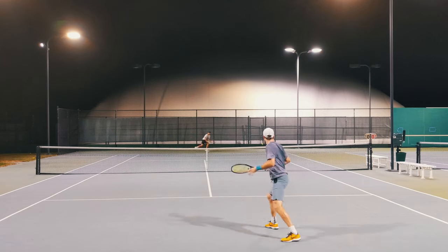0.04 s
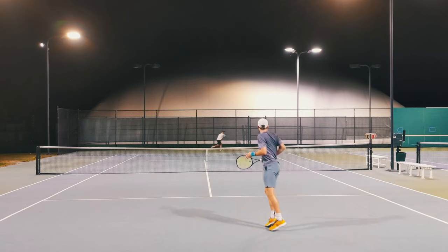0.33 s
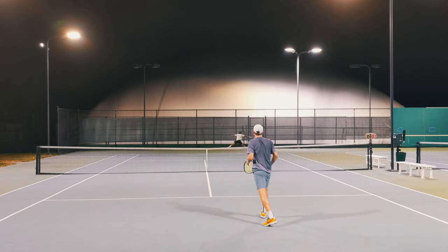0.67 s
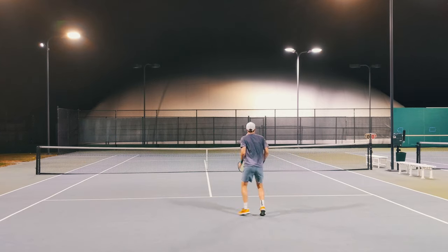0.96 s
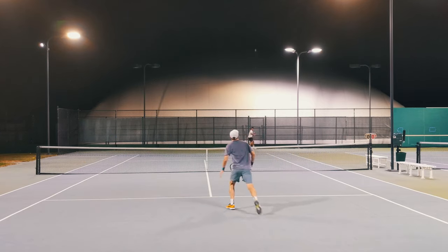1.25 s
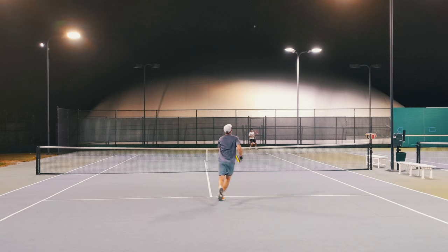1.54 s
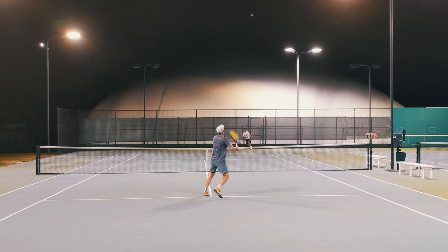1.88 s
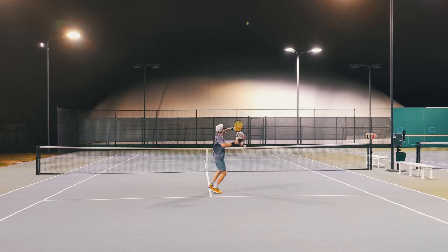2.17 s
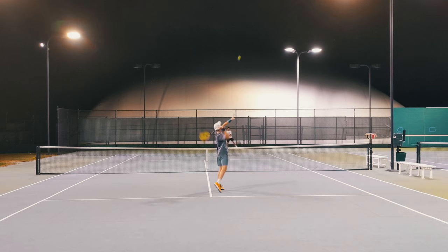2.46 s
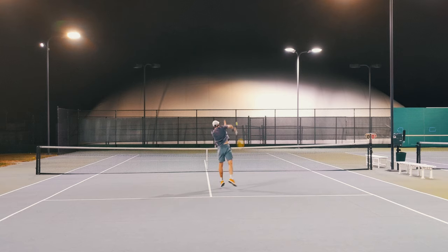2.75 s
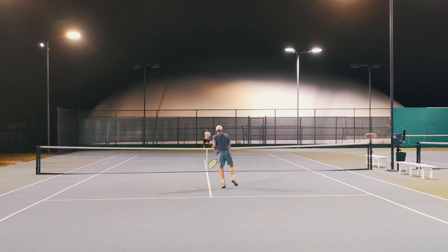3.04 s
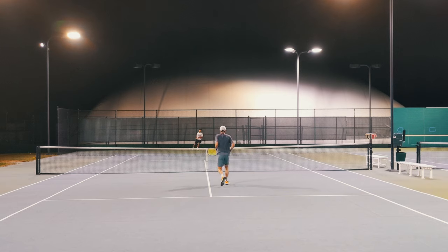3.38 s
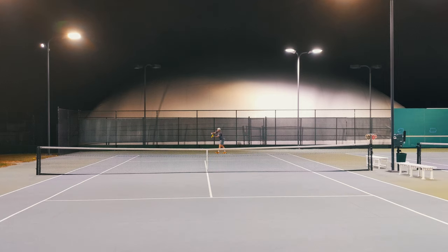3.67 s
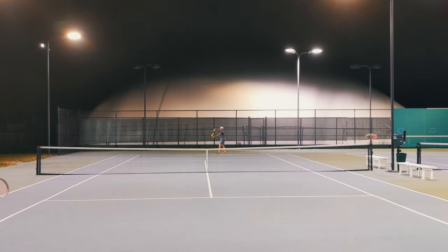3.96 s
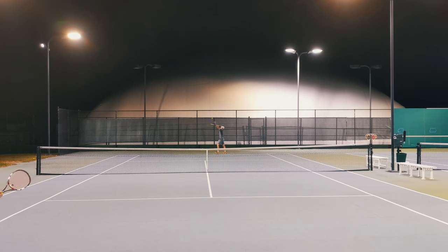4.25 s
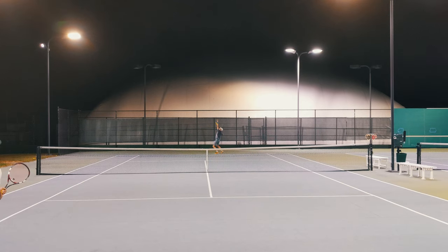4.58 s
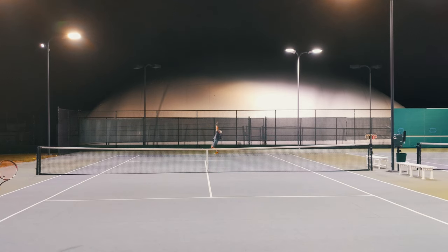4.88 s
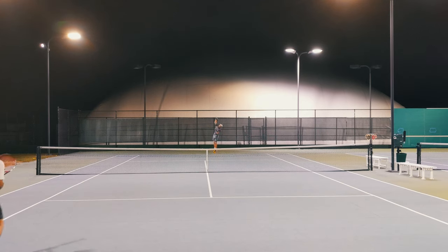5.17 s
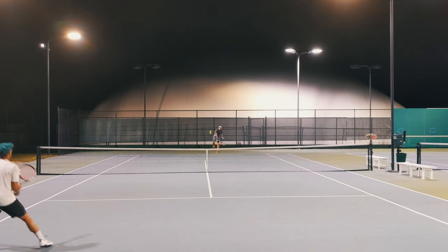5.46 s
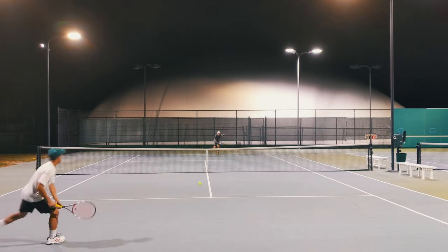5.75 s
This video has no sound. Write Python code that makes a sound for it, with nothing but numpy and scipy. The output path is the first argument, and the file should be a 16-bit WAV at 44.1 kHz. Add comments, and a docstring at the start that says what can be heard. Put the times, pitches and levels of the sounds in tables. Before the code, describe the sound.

On an outdoor tennis court at night, light steps and gritty shoe scuffs pass close to the microphone. A loud overhead smash cracks out, the ball knocks on the ground, and walls slap the sound back. After a lull, another racket hit pops and echoes, followed by a sliding shoe. Crickets chirr throughout above the faint rumble of a town, where a distant engine swells twice.

```python
"""Crickets trill to the left of the microphones, over the low rumble and hum of a town at night.
Close by, on an outdoor hard court, soles scuff and slide over grit, and ball and feet knock on the ground.
Far off, an engine pulls twice. An overhead smash comes at 2.8 s and a second stroke at 5.4 s:
the ball thumps into the strings and pops free, and the fences and walls throw each hit back."""
import sys
import numpy as np
from scipy import signal
from scipy.fft import rfft, irfft
from scipy.io import wavfile
from scipy.ndimage import uniform_filter1d

SR = 44100
rng = np.random.default_rng(int(sys.argv[2]) if len(sys.argv) > 2 else 0)


def store_wav(level_fs):
    """Save 16-bit WAV to argv[1]."""
    pcm = np.round(np.clip(np.atleast_2d(level_fs), -1, 1) * 32767)
    wavfile.write(sys.argv[1], SR, pcm.T.astype(np.int16))


N = 256662
TIME = np.arange(N) / SR


def amp(db):
    """Decibels to gain."""
    return 10 ** (np.asarray(db) / 20)


def unit_rms(x):
    """Scales to rms 1."""
    return x / np.sqrt(np.mean(x ** 2) + 1e-20)


def at_hz(points, hz):
    """Reads a table on a log-frequency axis."""
    f, value = np.transpose(points)
    return np.interp(np.log(hz + 1), np.log(f + 1), value)


def add(mix, s, sound):
    """Mixes a stereo sound in at time s."""
    part = mix[:, max(round(s * SR), 0):][:, :sound.shape[1]]
    part += sound[:, :part.shape[1]]


def panned(x, balance_db):
    """Sets the level of the left microphone against the right."""
    return x * amp(np.array([[.5], [-.5]]) * balance_db)


def decay(t, t60):
    """Falls 60 dB in t60 seconds."""
    return np.exp(-np.log(1000) * t / t60)


def wander(per_s):
    """A smooth random drift of about unit size."""
    knots = rng.standard_normal(int(N / SR * per_s) + 2)
    return np.interp(TIME * per_s, np.arange(len(knots)), knots)


def noise(colour, size, lag=0., likeness=0.74):
    """Coloured stereo noise at rms 1; its shared part reaches the left microphone lag seconds late."""
    hz = np.fft.rfftfreq(size, 1 / SR)
    shared, left, right = rfft(rng.standard_normal((3, size)))
    common = np.array([shared * np.exp(-2j * np.pi * hz * lag), shared])
    pair = np.sqrt(likeness) * common + np.sqrt(1 - likeness) * np.array([left, right])
    return unit_rms(irfft(pair * amp(at_hz(colour, hz)), size))


def trill(hz, rate, jitter_hz, glide_hz=240, unsteady=0.024):
    """Each closing of a cricket's wings scrapes out one pulse that starts quickly and falls in pitch."""
    beat = (rng.random() + np.cumsum(rate * (1 + unsteady * wander(5))) / SR) % 1
    pitch = hz + glide_hz * (.4 - beat) + jitter_hz * wander(160)
    pulse = np.sin(np.pi * np.minimum(beat / 0.8, 1) ** 0.78) ** 2
    return unit_rms(pulse * np.sin(2 * np.pi * np.cumsum(pitch) / SR))


def scattered(x, diffuse, lead_s=0.000409):
    """Sound from the left, partly scattered by grass, fence and trees along slowly changing paths."""
    t = np.arange(4096) / SR
    paths = rng.standard_normal((2, 2, len(t))) * np.exp(-t / 0.036)
    one, other = signal.oaconvolve(x[None, None], paths, axes=2)[..., :N]
    turn = np.pi * wander(1.6)
    wash = np.cos(turn) * one + np.sin(turn) * other
    direct = np.array([x, np.interp(TIME - lead_s, TIME, x)])
    return np.sqrt(1 - diffuse) * unit_rms(direct) + np.sqrt(diffuse) * unit_rms(wash)


# Spectrum of the farthest crickets: f/Hz, relative level/dB
FAR_CHORUS = [(4300, -28), (4650, -20.5), (4900, -14), (5100, -0.5), (5300, -7), (5550, -5.5),
              (5750, -15.5), (5950, -21), (6200, -73)]
# Groups behind the near cricket: f/Hz, spread/Hz, jitter/Hz, wing rate/Hz, level/dB, L-R/dB, diffuse share
CRICKET_GROUPS = [(5350, 190, 75, 72, -57, -1, 0.79), (2774, 110, 130, 52, -71.5, 4, 0.35),
                  (7430, 440, 220, 33, -77.5, -0.5, 1)]
# One lower cricket joins in briefly: t/s, level/dB
SHORT_TRILL = [(3.66, -95), (3.72, -66), (3.99, -71), (4.02, -95)]
def crickets(count=5, rate_spread=.03, near_db=-61, far_db=-60, waver_db=0.9):
    """One cricket is near; groups trill behind it, each animal at its own pitch; the far ones blur."""
    near = scattered(trill(hz=5300, rate=49, jitter_hz=64.5), diffuse=0.2)
    far = noise(FAR_CHORUS, N, lag=-0.000396, likeness=0.13)
    out = panned(amp(near_db) * near + amp(far_db) * far, balance_db=3.5)
    for hz, spread_hz, jitter_hz, rate, db, balance_db, diffuse in CRICKET_GROUPS:
        group = np.zeros(N)
        for offset in np.linspace(-1, 1, count):
            voice = trill(hz + offset * spread_hz, rate * (1 + rate_spread * offset), jitter_hz)
            group += np.exp(-1.3 * abs(offset)) * voice
        out += amp(db + waver_db * wander(5.3)) * panned(scattered(group, diffuse), balance_db)
    joiner = scattered(trill(hz=4880, rate=55, jitter_hz=76.4), diffuse=0.66)
    return out + amp(np.interp(TIME, *np.transpose(SHORT_TRILL))) * joiner


# The distant town, heard from the court: f/Hz, level/dB in a 1 Hz band
TOWN_SPECTRUM = [(15, -75.5), (30, -65.5), (60, -69), (120, -72.5), (170, -76.5), (250, -83.5), (420, -83),
                 (780, -83), (1000, -86.5), (1400, -96), (2000, -103), (4500, -107), (6400, -115),
                 (9300, -111), (12000, -118), (16000, -120)]
# Slow contour that the rumble partly follows: t/s, relative level/dB
RUMBLE_CONTOUR = [(0, -46.5), (.14, -52), (4.6, -50.5), (5.2, -48.5), (5.82, -45)]
# How alike the town is at the two microphones: f/Hz, correlation
TOWN_LIKENESS = [(60, 0.97), (130, 0.97), (290, 0.38), (640, 0.24), (1410, 0.089), (3100, 0.33),
                 (6820, -0.9), (15000, 0.41)]
# The side it leans to: f/Hz, L-R/dB
TOWN_BALANCE = [(60, -0.5), (200, 0.5), (400, 3), (2400, 3.5), (4400, -0.5), (8000, -4.5), (15000, 7.5)]
def town(patchy_db=0.67, swell=0.87, heaves_per_s=9.2, rumble_hz=220):
    """Far traffic and fans: a heaving rumble under a smooth wash."""
    size, hop = 2048, 512
    frames, hz = N // hop + 5, np.fft.rfftfreq(size, 1 / SR)
    a, b, c, d, patches = rng.standard_normal((5, frames, len(hz)))
    patches = unit_rms(uniform_filter1d(uniform_filter1d(patches, size=8, axis=0), size=14, axis=1))
    likeness = at_hz(TOWN_LIKENESS, hz)
    left = a + 1j * b
    right = likeness * left + np.sqrt(1 - likeness ** 2) * (c + 1j * d)
    contour = np.interp(TIME, *np.transpose(RUMBLE_CONTOUR)) + 1.5 * wander(heaves_per_s)
    heave = np.interp(np.arange(frames) * hop / SR, TIME, contour - contour.mean())
    steady_db = at_hz(TOWN_SPECTRUM, hz)
    field_db = steady_db + patchy_db * patches + swell * heave[:, None] / (1 + (hz / rumble_hz) ** 4)
    lean_db = at_hz(TOWN_BALANCE, hz) / 2
    spectra = np.array([left * amp(field_db + lean_db), right * amp(field_db - lean_db)])
    wash = signal.istft(spectra.transpose(0, 2, 1), nperseg=size, noverlap=size - hop)[1][:, :N]
    return unit_rms(wash) * np.sqrt(np.sum(amp(steady_db) ** 2) * hz[1])


def machine_tone(hz, db, drift=0.0126, waver_db=2.5):
    """One tone that wavers in level and pitch."""
    peak = np.sqrt(2) * amp(db + waver_db * wander(12))
    pitch = hz * (1 + drift * wander(14))
    return peak * np.sin(2 * np.pi * np.cumsum(pitch) / SR)


# Steady tones around the court: f/Hz, level/dB
HUM_TONES = [(58.5, -59.5), (116, -66.5), (229.5, -68), (388, -68.5)]
def hum():
    """Floodlights and a blower hum faintly, the same in both microphones."""
    return sum(machine_tone(hz, db) for hz, db in HUM_TONES)


def light_steps(start_s=.3, end_s=3.3, per_s=4.3, length_s=0.025, hiss_db=-68.5, bite_db=1):
    """Soft, unevenly spaced steps of the run to the net, as rows of scuffs."""
    times = start_s + np.cumsum(rng.uniform(.5, 1.5, size=16)) / per_s
    return [(s, length_s, hiss_db, bite_db) for s in times if s < end_s]


# Shoes of the two near players: t/s, length/s, grit hiss/dB, bite (sole rasp over the hiss)/dB
SCUFFS = [(.045, 0.12, -60.5, -2.5), (0.12, 0.032, -68.5, 21), (.143, 0.033, -51, -4),
          (0.174, 0.053, -53.5, 4.5), (.376, 0.049, -51, -13), (.524, .016, -62, 2), (.6, .04, -64.5, 5.5),
          (.875, 0.06, -61, 12.5), (.918, 0.04, -66.5, 20), (.955, .16, -63, 8.5),
          (1.18, 0.036, -52.5, 2.5), (1.218, 0.092, -58.5, 0.5), (1.702, 0.023, -56, 2),
          (2.001, .024, -52.5, 6.5), (2.408, 0.039, -66.5, 12), (2.595, 0.061, -61.5, -1),
          (2.884, .025, -64, 12), (2.96, 0.081, -69, 9.5), (3.396, 0.023, -58.5, -3),
          (3.645, 0.038, -50.5, -5.5), (5.15, 0.06, -62, -15), (5.208, 0.063, -58, -20),
          (5.584, 0.06, -43, -1.5), (5.64, 0.087, -50.5, -0.5), (5.733, 0.035, -49, 1)]
# Where each is, seen from the microphones: t/s, side (negative left, positive right)
RUNNER_PATH = [(0, 0.4), (.55, 0.8), (1.2, 0.13), (2, 0.077)]
PARTNER_PATH = [(5, -1.12), (5.6, -0.47)]
# Hiss of the grit: f/Hz, relative level/dB
GRIT_COLOUR = [(1000, -1), (3500, -6), (5500, 5.5), (7200, 2.5), (9300, 5.5), (10700, -5), (12000, -4),
               (14000, -4.5), (16000, -10.5)]
# Rasp of the sole: multiple of the rasp centre, relative level/dB
RASP_COLOUR = [(.1, -13), (.35, 4), (.7, -6.5), (1, 5.5), (1.3, 1), (1.8, -12.5), (5, -48)]
def scuffs(grain_db=2.5, sag_db=6.5, release_s=0.0087, port_lag_s=0.00031, sizzle_db=4, sizzle_hz=11500):
    """A sole slides over grit, catching and slipping; it grips, fades as it slows and lifts off."""
    out, t = np.zeros((2, N)), (np.arange(12288) - 2048) / SR
    for s, length, hiss_db, bite_db in SCUFFS + light_steps():
        path = RUNNER_PATH if s < PARTNER_PATH[0][0] else PARTNER_PATH
        side = np.interp(s, *np.transpose(path))
        attack_s = 0.0055 + 0.19 * length  # a longer slide takes longer to grip
        grip = (1 + np.tanh(2 * t / attack_s)) / 2
        lift = (1 - np.tanh(2 * (t - length) / release_s)) / 2
        pressure = grip * lift * amp(-sag_db * np.clip(t / length, 0, 1))
        roughness = unit_rms(uniform_filter1d(rng.standard_normal(len(t)), size=70))
        catches = unit_rms(amp(grain_db * roughness))
        # the top of the hiss is stronger from the right, shaded from the left
        hiss_colour = [(hz, db + sizzle_db * side * (hz > sizzle_hz)) for hz, db in GRIT_COLOUR]
        hiss = noise(hiss_colour, len(t), side * port_lag_s, likeness=0.34)
        rasp_hz = 2820 - 106 * np.clip(bite_db - 11, 0, 10)  # a hard bite rasps lower
        rasp_colour = [(k * rasp_hz, db) for k, db in RASP_COLOUR]
        rasp = noise(rasp_colour, len(t), side * port_lag_s, likeness=0.32)
        slide = amp(hiss_db) * (hiss + amp(bite_db) * rasp) * pressure * catches
        add(out, s + t[0], panned(slide, balance_db=1.5)[:, t + s >= 0])
    return out


def thump(t, hz):
    """The air pushed by one short contact, centred on t = 0."""
    u = (np.pi * hz * t) ** 2
    return (1 - 2 * u) * np.exp(-u)


def ring(t, hz, t60, rise):
    """One mode that swells from t = 0 and dies away."""
    t = np.maximum(t, 0)
    return np.sin(2 * np.pi * hz * t) * (1 - np.exp(-t / rise)) * decay(t, t60)


def add_knock(mix, s, thump_db, pock_db, pock_hz, tick_db, balance_db=0, lead_s=.004):
    """A small impact is a low push, a short hollow ring and a tick of grit."""
    t = np.arange(4096) / SR - lead_s
    grit = noise([(400, 19), (1500, 4.5), (3000, 9.5), (4500, -16), (10000, -10), (16000, -27)], len(t))
    tick = grit * (t > 0) * decay(t, t60=0.057)
    pock = ring(t, pock_hz, t60=0.012, rise=0.00031)
    sound = amp(thump_db) * thump(t, hz=366) + amp(pock_db) * pock + amp(tick_db) * tick
    add(mix, s - lead_s, panned(sound, balance_db))


# Ball bounces and footfalls: t/s, thump/dB, pock/dB, pock f/Hz, tick/dB
KNOCKS = [(0.411, -44, -37.5, 1330, -49), (0.8128, -28, -53, 840, -43.5), (.827, -37, -55, 900, -51),
          (.846, -39.5, -43, 990, -50), (2.9155, -38, -20.5, 1056, -45), (3.216, -45, -35, 1020, -45.5),
          (3.43, -33.5, -38.5, 1490, -47)]
def knocks():
    """Ball and feet knock on the hard court, centred between the microphones."""
    out = np.zeros((2, N))
    for row in KNOCKS:
        add_knock(out, *row)
    return out


# Pulls of a distant engine: start t/s, end t/s, level at the end/dB
ENGINE_PULLS = [(.56, 1.166, -54), (5, 5.16, -55.5)]
def engine(hz=152, rise_db_per_s=11, fade_s=0.036):
    """Far off, an engine's drone swells through each pull and drops away."""
    out = np.zeros(N)
    for start, end, db in ENGINE_PULLS:
        held = np.clip(TIME, start, end)
        fade = np.exp(-((TIME - held) / fade_s) ** 2)
        out += machine_tone(hz, db - rise_db_per_s * (end - held)) * fade
    return out


# Racket strokes at the microphones: t/s, thump/dB, thump f/Hz, release/s, pop/dB, pop rise/s,
# string crack/dB, ground echo delay/s, ground echo share, L-R/dB
STROKES = [(2.7811, -11, 443, .00335, -9, 0.00089, -32.5, 0.002085, 0.88, 1.3),
           (5.4454, -23, 310, 0.00188, -3, 0.0015, -41.5, 0.001015, 0.22, 1.7)]
# Ball and strings ringing together, near racket and far: f/Hz, level against the pop/dB, t60/s
NEAR_RACKET_MODES = [(974, 6, 0.012), (1374, -27, 0.082), (1504, -23, 0.028), (2520, -8.5, 0.01),
                     (3150, -17, 0.017), (3930, -30, 0.019), (5800, -30, .016)]
FAR_RACKET_MODES = [(1060, 4, 0.01), (945, -22.5, 0.054), (1440, -18, 0.014), (1710, -8, 0.0096),
                    (2680, -20, 0.015), (3060, -5.5, 0.0065), (5520, -15.5, 0.0066)]
# Crack of the strings: f/Hz, relative level/dB
CRACK_COLOUR = [(500, -11), (1300, 12), (1800, 4), (2600, 12), (4500, 1.5), (7500, -1.5), (9800, -1),
                (11000, -2), (11800, -8), (14000, -10), (16000, -18)]
def strokes(contact_s=0.0021, crack_t60=0.042, crack_rise_s=0.00067):
    """The ball flattens on the strings with a thump and a crack, then pops free; the ground echoes it."""
    out, t = np.zeros((2, N)), np.arange(4096) / SR
    for row, modes in zip(STROKES, (NEAR_RACKET_MODES, FAR_RACKET_MODES)):
        s, thump_db, thump_hz, release, pop_db, rise, crack_db, delay, ground, balance_db = row
        pop = sum(amp(db) * ring(t - release, hz, t60, rise) for hz, db, t60 in modes)
        body = amp(thump_db) * thump(t - contact_s, thump_hz) + amp(pop_db) * pop
        ground_echo = ground * np.interp(t - delay, t, body, left=0)
        # the strings rub on the felt while the ball is held
        rub = (1 - np.exp(-t / crack_rise_s)) * decay(np.maximum(t - 2 * contact_s, 0), crack_t60)
        crack = amp(crack_db) * rub * noise(CRACK_COLOUR, len(t), likeness=0.25)
        add(out, s, panned(body + ground_echo + crack, balance_db))
    return out


# What each stroke throws sideways to the fences and walls: t/s, level going out/dB
CLAPS = [(2.784, -12), (5.447, -12.5)]
# Spectrum of that clap: f/Hz, relative level/dB
CLAP_COLOUR = [(200, -13), (500, 18.5), (900, -14), (1400, 7), (2000, -14), (2800, -5.5), (4500, -13),
               (9000, -23), (15000, -36)]
def claps(decay_s=0.0028):
    """Off to the sides a stroke is a short, broad clap; only its echoes reach the microphones."""
    out, t = np.zeros((2, N)), np.arange(2048) / SR
    for s, db in CLAPS:
        add(out, s, amp(db) * np.exp(-t / decay_s) * noise(CLAP_COLOUR, len(t), likeness=0.48))
    return out


# Single echoes arriving at the microphones: t/s, pock level/dB, pock f/Hz, L-R/dB
WALL_SLAPS = [(2.8123, -35.5, 1470, 0), (2.935, -37.5, 1160, 5), (3.102, -35.5, 825, 19),
              (3.269, -44, 1220, 3), (5.4858, -25, 880, 2), (5.506, -24.5, 780, -1),
              (5.524, -37.5, 1160, 5), (5.553, -39, 1350, 3)]
def wall_slaps(thump_db=-9.5, tick_db=-16, tick_db_per_octave=26):
    """Walls and fences return the strokes as short slaps; a higher slap has more tick."""
    out = np.zeros((2, N))
    for s, db, hz, balance_db in WALL_SLAPS:
        bright_db = tick_db_per_octave * np.log2(hz / 1000)
        add_knock(out, s, db + thump_db, db, hz, db + tick_db + bright_db, balance_db)
    return out


# Decay of the tail from the buildings around the court: f/Hz, t60/s
COURT_T60 = [(200, 0.88), (1000, 1.8), (3000, 1.8), (8000, 0.32), (14000, 0.56)]
# Colour of that tail: f/Hz, level/dB
COURT_COLOUR = [(150, -30), (450, -21.5), (1000, -12.5), (1600, -16.5), (3200, -10), (8000, -10.5),
                (14000, -20)]
def court_echoes(x, early_db=-22, early_t60=0.12):
    """Quick scatter from the net and fences, then a faint long tail from the buildings."""
    hz, t, spectra = signal.stft(rng.standard_normal((2, SR)), SR, nperseg=256)
    t60 = at_hz(COURT_T60, hz)[:, None]
    fade = decay(t, t60) * np.sqrt(2 * np.log(1000) / (t60 * SR))  # about equal energy in each band
    tail = signal.istft(spectra * fade * amp(at_hz(COURT_COLOUR, hz))[:, None], SR, nperseg=256)[1]
    age = np.arange(tail.shape[1]) / SR
    early = rng.standard_normal(tail.shape) * decay(age, early_t60) * (age > .005)
    early = signal.lfilter(*signal.butter(1, 700, "high", fs=SR), early / np.linalg.norm(early[0]))
    return signal.fftconvolve(x, tail + amp(early_db) * early, axes=1)[:, :N]


def scene(spill_db=-6):
    """The players on the court, with the night around them."""
    night = crickets() + town() + hum() + engine()
    sideways = claps()
    play = strokes() + knocks() + wall_slaps() + scuffs()
    return night + play + court_echoes(amp(spill_db) * play + sideways)


# Left microphone port against the right: f/Hz, L-R/dB
PORT_BALANCE = [(3000, 0.5), (5300, 0.9), (6500, .5), (9300, 4.5), (10200, 7), (11200, -16), (12600, 3.5),
                (14000, -14), (16000, -4)]
def record(dry, edge_hz=15900):
    """The two microphone ports differ in the treble; the recorder cuts off above edge_hz."""
    balance_db = at_hz(PORT_BALANCE, np.fft.rfftfreq(N, 1 / SR))
    heard = irfft(panned(rfft(dry), balance_db), N)
    lowpass = signal.firwin(511, edge_hz, window=("kaiser", 9), fs=SR)
    return signal.oaconvolve(heard, lowpass[None], "same")


dry = scene()
out = record(dry)
store_wav(out)
```